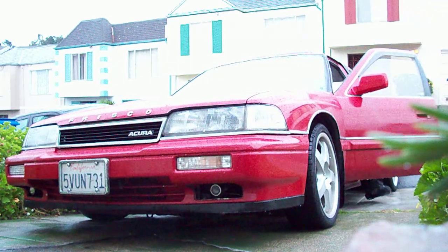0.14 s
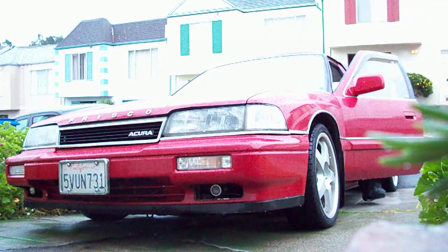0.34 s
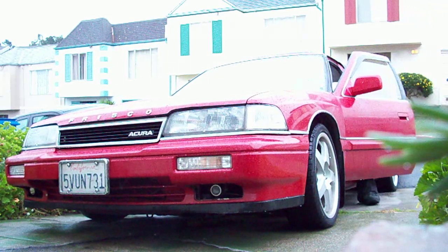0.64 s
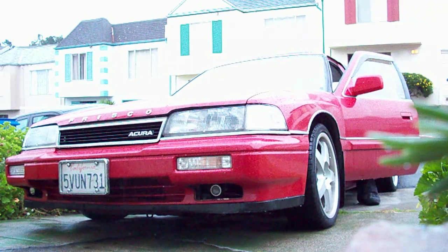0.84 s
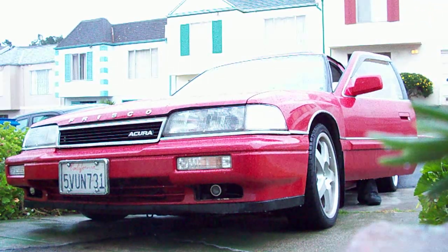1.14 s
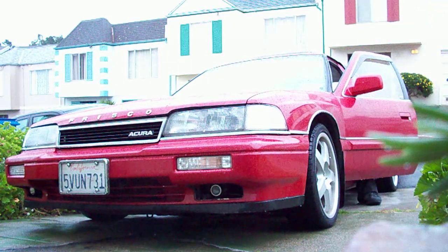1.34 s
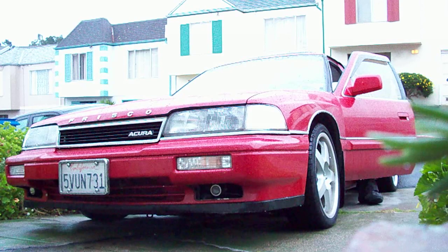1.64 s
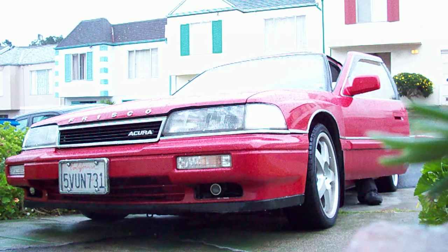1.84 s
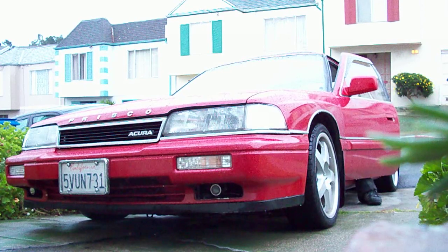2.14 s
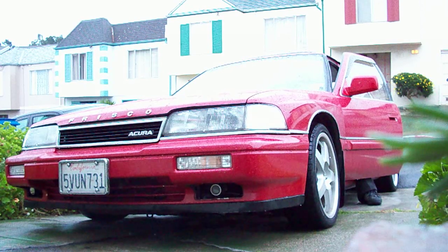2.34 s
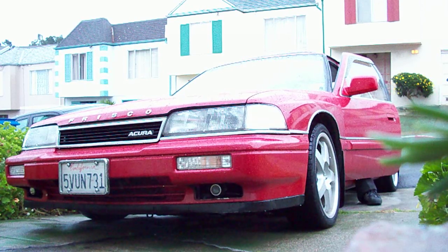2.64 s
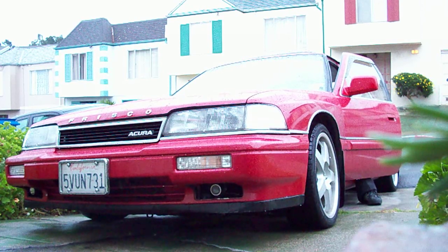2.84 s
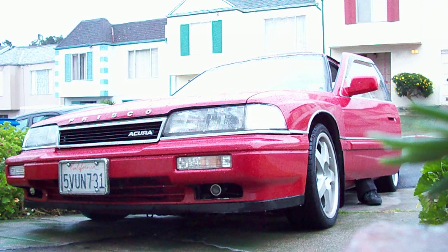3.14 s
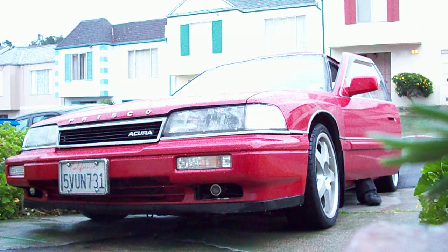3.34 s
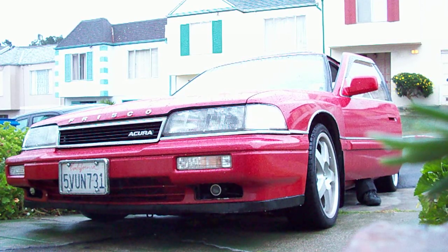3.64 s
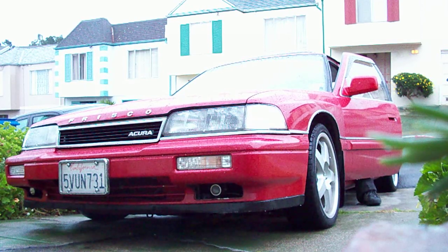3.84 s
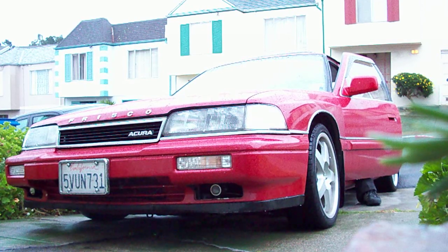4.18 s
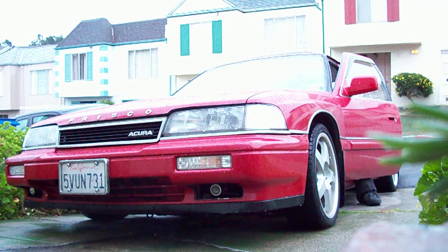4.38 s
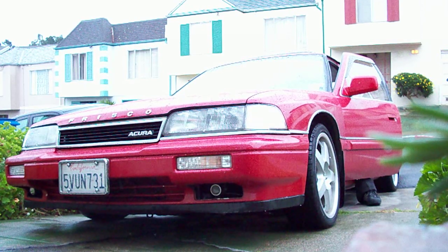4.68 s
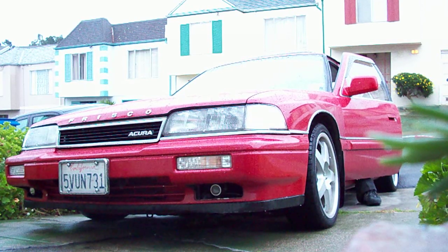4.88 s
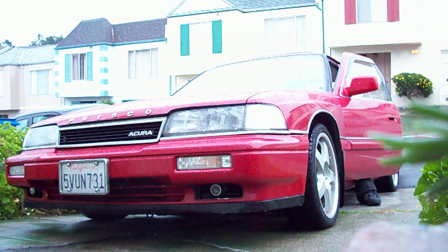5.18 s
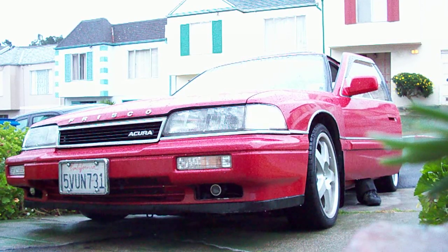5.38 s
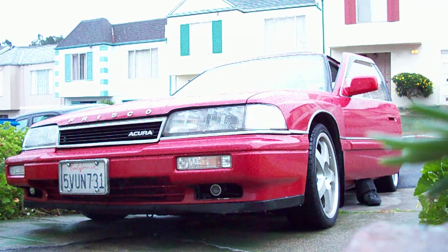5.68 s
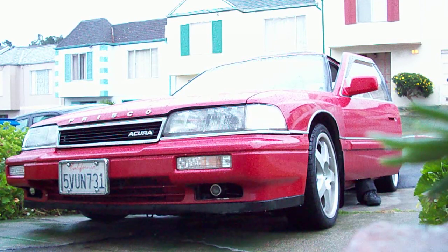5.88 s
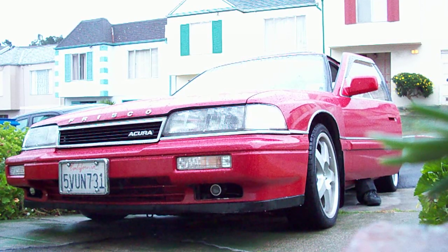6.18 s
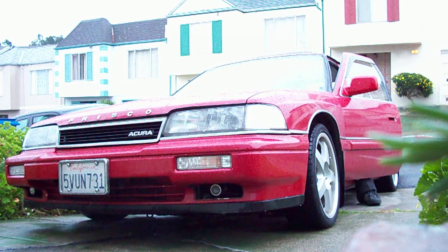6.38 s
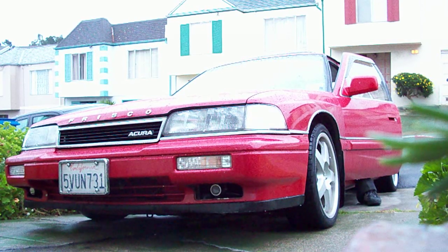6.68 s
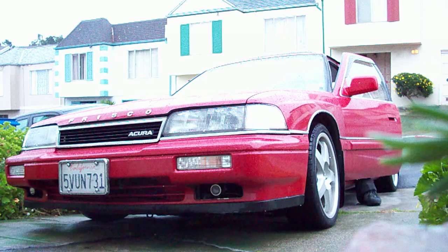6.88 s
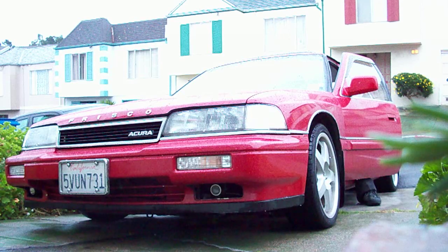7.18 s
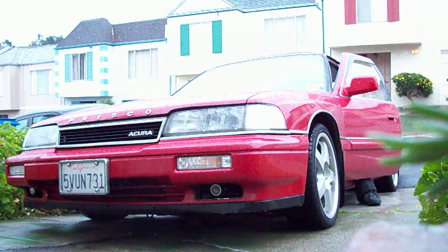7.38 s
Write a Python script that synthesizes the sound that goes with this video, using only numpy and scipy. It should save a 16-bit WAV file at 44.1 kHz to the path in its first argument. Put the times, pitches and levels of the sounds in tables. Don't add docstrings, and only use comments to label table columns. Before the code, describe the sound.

Beside a parked car outdoors, a stuttering hinge creak and small clicks sound over soft, wavering traffic noise and a far engine hum. A short falling bird chirp follows. In the second half come three loud, bright, nasal honks at one steady pitch, each a little shorter than the last, with quick echoes from houses. The recorder's level ducks at every honk, then the street noise swells back.

```python
import sys
import numpy as np
from scipy import signal
from scipy.fft import rfft, irfft
from scipy.io import wavfile
from scipy.ndimage import minimum_filter1d

SR = 44100
rng = np.random.default_rng(int(sys.argv[2]) if len(sys.argv) > 2 else 0)


def waveform_to_disk(signal):
    frames = np.transpose(np.atleast_2d(signal))
    scaled = np.clip(frames, -1, 1) * 32767
    samples = np.round(scaled).astype(np.int16)
    wavfile.write(sys.argv[1], SR, samples)


def elevation(decibels):
    levels = np.asarray(decibels, float)
    return 10 ** (levels / 20)


N = 331632

# time_s, roar_db
CAR_NEARNESS = [(0.0, 3), (.25, 0.5), (.45, 4.5), (.75, 2), (1.1, -0.5), (1.5, 1.8), (1.9, 5), (2.4, 3.5),
                (2.75, 0.5), (3.1, -2), (3.8, -3), (4.9, -4), (5.4, -3), (6.3, -4.5), (6.7, -3), (7.5, 3.3)]
# frequency_hz, density_db (per Hz)
TRAFFIC_SPECTRUM = [(12, -39), (20, -9.5), (43, 2), (75, -3.5), (118, -10.5), (228, -15.5), (308, -20),
                    (387, -28.5), (525, -16.5), (643, -31), (729, -28), (2650, -46), (5260, -50.5),
                    (7500, -55), (8510, -65.5), (11100, -100), (18700, -120)]
# time_s, firing_hz, load_db
ENGINE_RUN = [(0.0, 24.88, 0), (.46, 28.37, -1), (1.0, 31.48, -4), (1.5, 38.83, 2.5), (1.75, 39.52, -6),
              (2.4, 35.97, -5), (2.82, 40.82, -3), (3.55, 43.15, 0.9), (3.85, 47.2, -2), (4.8, 48.6, 0),
              (5.45, 49.6, -1.8), (6.25, 51.4, -2), (6.5, 51.0, -3.5), (6.75, 50.06, 0.8),
              (7.5, 49.87, 0.5)]
# frequency_hz, gain_db
EXHAUST_BOOM = [(25, -49.5), (38, -34.5), (50, -24), (72, -28.5), (88, -26.5), (104, -37.5), (140, -46.5),
                (195, -40)]
# top_s, top_hz, fall_s, level_db
WHISTLES = [
    (1.692, 5320, .034, -43),
    (3.343, 5350, .040, -54),
    (5.308, 5430, .040, -55.5),
]
# start_s, peak_db, pitch_hz, t60_s
DULL_TICKS = [(0.0598, -44, 1480, 0.017), (0.1241, -35, 1510, 0.084), (0.1694, -46, 1790, 0.012),
              (0.384, -35.5, 2880, 0.02), (0.7003, -34.5, 1960, 0.023), (2.607, -43, 1647, 0.028),
              (3.1697, -28.5, 1922, 0.0095), (3.5897, -34.5, 2020, 0.0098), (5.1417, -37.5, 1870, 0.013)]
# start_s, peak_db, pitch_hz, t60_s
BRIGHT_TICKS = [(0.1656, -45, 4890, 0.041), (0.5072, -46, 4800, 0.029), (0.627, -41, 5470, 0.03),
                (0.699, -32, 5050, 0.016), (0.743, -43, 6600, 0.022), (0.9846, -53, 4750, 0.022),
                (3.2746, -42, 6170, 0.059), (3.4176, -43, 4930, 0.027), (5.0456, -44, 5096, 0.024),
                (7.1548, -42, 6820, 0.034)]
# start_s, peak_db, pitch_hz, t60_s
HINGE_CREAKS = [
    (0.055, -33.5, 1280, 0.078),
    (0.1645, -38.5, 1380, 0.069),
    (0.2236, -39, 1420, 0.044),
    (0.2857, -40, 1410, 0.054),
    (0.3356, -36.5, 1320, 0.18),
]
# frequency_hz, t60_s, level_db
FAR_ECHOES = [(500, 0.98, -34.5), (1800, 0.62, -21), (2297.5, 1.3, -31), (2600, 1.2, -43), (3370, 0.9, -27),
              (4540, 0.8, -26), (6050, 0.45, -38), (9000, 0.22, -42.5)]
# delay_s, level_db
HOUSE_RETURNS = [
    (0.116, -8.5),
    (0.228, -20.5),
]
# on_s, off_s, buzz_hz
PRESSES = [
    (4.1428, 4.390, 327.33),
    (5.5005, 5.724, 327.1),
    (6.7872, 6.995, 327.15),
]
UNEVEN_BLOWS_DB = [0.2, 2, 2]
DISC_WHOLE_DB = [-7, -33, -49, -42, -47, -30, 0, -3.5, -26, -32, -31, -33, -35, -40, -43, -26, -39, -31,
                 -28, -27, -38, -31, -42, -40]
DISC_HALF_DB = [-46, -45, -47, -48, -52, -34, -24, -17, -42, -47, -45, -44, -48, -38, -41, -36, -47, -42,
                -26, -43, -32, -37, -45, -50, -54]

RUMBLE_FOLLOWS, HISS_FOLLOWS = 0.5, 0.15
GUST_DB, PATCHY_DB = 1.5, 1.1
THIRD_ORDER_DB, WAVER_DB, PHASE_WANDER_RAD = -8, 2.5, 0.4
CHIRP_RISE_S, CHIRP_BEND_HZ, CHIRP_EDGE_DB = 0.016, 1450, 22
CHIRP_LOUDEST = 0.4
NEAR_DB, NEAR_T60_S = -17, 0.18
DISC_DB, DIAPHRAGM_DB, DIAPHRAGM_START_DB = 7, 0.5, 1.5
CRACK_DB, RELAY_DB, RATTLE_DB = -5, -13, -31.5
STRIKE_LAG_S = 0.0153
SWING_PHASE_RAD, BLOW_PHASE_RAD = 0.65, 3.3
SWING_UP_S, DISC_UP_S = 0.011, 0.0024
DISC_T60_S, RATTLE_T60_S, SETTLE_T60_S, RING_T60_S = 0.038, 0.17, 0.25, 0.316
FREE_HZ, SAG_AFTER_S = 323.0, 0.069
FIRST_BLOWS, FIRST_BLOWS_T60_S = 0.05, 0.012
DUCK_FROM_DB, ATTACK_S, HOLD_S, RELEASE_DB_S = -9, 0.0025, 0.079, 40.5
PREAMP_DB = -64
RECORDER_HZ = 16000
CUT_HZ, CLIP, ROUNDED_HZ = 8030, 0.70, 11500


def in_time(rows):
    s, *columns = np.transpose(rows)
    return [np.interp(np.arange(N) / SR, s, c) for c in columns]


def at_hz(points, hz, axis=1):
    points = np.array(points)
    return np.interp(np.log(hz), np.log(points[:, 0]), points[:, axis])


def drift(rate):
    r = np.exp(-80 * np.pi * rate / SR)
    slow = signal.lfilter([1], [1, -2 * r, r * r], rng.standard_normal(N // 40 + 2002))[2000:]
    return np.interp(np.arange(N) / 40, np.arange(len(slow)), slow / slow.std())


def band(x, low_hz, high_hz):
    return signal.sosfilt(signal.butter(2, [low_hz, high_hz], "band", fs=SR, output="sos"), x)


def swell(t, rise_s, off_s, t60):
    return (1 - np.exp(-np.maximum(t, 0) / rise_s)) * elevation(-60 * np.maximum(t - off_s, 0) / t60)


def traffic():
    near_db, = in_time(CAR_NEARNESS)
    rumble_db = RUMBLE_FOLLOWS * near_db + GUST_DB * drift(4.3)
    hiss_db = HISS_FOLLOWS * near_db
    edges = 20 * 2 ** (np.arange(28) / 3)
    white = rng.standard_normal((2, N))
    out = np.zeros(N)
    for k, (low, high) in enumerate(zip(edges, edges[1:])):
        follow_db = rumble_db if low <= 200 else near_db if low <= 1000 else hiss_db
        level_db = at_hz(TRAFFIC_SPECTRUM, np.sqrt(low * high)) + follow_db + PATCHY_DB * drift(3.4)
        out += elevation(level_db) * band(white[k % 2], low, high)
    out = signal.sosfilt(signal.butter(2, 30.0, "high", fs=SR, output="sos"), out)
    return out / out[:4 * SR].std()


def engine():
    hz, load_db = in_time(ENGINE_RUN)
    turn = 2 * np.pi * np.cumsum(hz) / SR
    out = np.zeros(N)
    for k in range(1, 5):
        level_db = load_db + at_hz(EXHAUST_BOOM, k * hz) + THIRD_ORDER_DB * (k == 3)
        level_db = level_db + WAVER_DB * drift(4.1)
        out += np.sqrt(2) * elevation(level_db) * np.sin(k * turn + PHASE_WANDER_RAD * drift(3.2))
    return out


def bird():
    out, t = np.zeros(N), np.arange(N) / SR
    for top_s, top_hz, fall_s, db in WHISTLES:
        rising = t < top_s
        arc = (t - top_s) / np.where(rising, CHIRP_RISE_S, fall_s)
        arc = np.clip(arc, -3, 3)
        hz = top_hz - CHIRP_BEND_HZ * np.where(rising, 0.2, 1) * np.minimum(np.abs(arc), 1.3) ** 1.5
        from_loudest = (arc - CHIRP_LOUDEST) * np.where(arc < CHIRP_LOUDEST, 0.8, 1.3)
        level_db = db - CHIRP_EDGE_DB * np.abs(from_loudest) ** 3 + 3.2 * drift(60.0)
        out += np.sqrt(2) * elevation(level_db) * np.sin(2 * np.pi * np.cumsum(hz) / SR)
    echo = rng.standard_normal(2000) * elevation(-60 * np.arange(2000) / SR / 0.2)
    return out + elevation(-35) * signal.fftconvolve(out, echo)[:N]


def ticks(rows, width):
    out, t = np.zeros(N), np.arange(3000) / SR
    for (s, db, hz, t60), noise in zip(rows, rng.standard_normal((len(rows), 3000))):
        click = band(noise * swell(t, 0.00089, 0, t60), hz / width, min(hz * width, 9000))
        out[round(s * SR):][:3000] += elevation(db) * click / np.abs(click).max()
    return out


def street(low, high):
    t = np.arange(2 * SR) / SR
    edges = 400 * 2 ** np.arange(0, 4.6, 0.5)
    noise = rng.standard_normal((2 * SR, 2)).T * (t > 0.004)
    far = np.zeros(2 * SR)
    for a, b in zip(edges, edges[1:]):
        far += band(noise[0], a, b) * elevation(-60 * t / at_hz(FAR_ECHOES, np.sqrt(a * b)))
    far = far / np.sqrt(np.sum(far ** 2))
    hz = np.arange(SR + 1) / 2 + 1
    far = irfft(rfft(far) * elevation(at_hz(FAR_ECHOES, hz, axis=2)))
    near = noise[1] * elevation(-60 * t / NEAR_T60_S)
    near = elevation(NEAR_DB) * near / np.sqrt(np.sum(near ** 2))
    return low + high + signal.fftconvolve(high, far + near)[:N]


def ring_out(after_s):
    paths = [(0.011, 0.024)] + HOUSE_RETURNS
    out = 0
    for k, (lag, db) in enumerate(paths):
        out = out + (-1) ** k * elevation(db - 60 * np.maximum(after_s - lag, 0) / RING_T60_S)
    return out


def disc_tone(blows, lines, phases, half_db):
    out = 0
    for (k, db), phase in zip(lines, phases):
        if k == 2:
            continue
        offset = 0 if k in (14, 16) else phase
        out = out + elevation(db + half_db * (k % 2)) * np.cos(k / 2 * (blows - BLOW_PHASE_RAD) + offset)
    return out


def loose_contacts(since, length):
    t, noise = since + STRIKE_LAG_S, rng.standard_normal(SR)
    shape = swell(since, DISC_UP_S, length, RATTLE_T60_S)
    rattle = elevation(RATTLE_DB) * band(noise, 400, 8000) * shape
    rattle += elevation(-36.5) * band(band(noise, 2700, 2800), 2700, 2800) * shape
    rattle += elevation(-23.5) * band(noise, 450, 3700) * swell(since - length, 0.0037, 0, SETTLE_T60_S)
    crack = elevation(CRACK_DB) * band(noise, 240, 6500) * swell(since, 0.000062, 0, 0.0063)
    grazing = np.clip(t / STRIKE_LAG_S, 0, 1) ** 2 * (since < 0)
    scrape = elevation(-16) * band(noise, 1800, 5700) * grazing
    return rattle, crack + scrape


def horn():
    low, high, t = np.zeros(N), np.zeros(N), np.arange(SR) / SR
    lines = [(2 * k + 2, db) for k, db in enumerate(DISC_WHOLE_DB)]
    lines += [(2 * k + 1, db) for k, db in enumerate(DISC_HALF_DB)]
    lines.sort()
    phases = rng.uniform(0, 2 * np.pi, len(lines))
    for (on, off, hz), half_db in zip(PRESSES, UNEVEN_BLOWS_DB):
        at, since, length = round(on * SR), t - STRIKE_LAG_S, off - on - STRIKE_LAG_S
        turn = 2 * np.pi * np.cumsum(np.where(t < off - on + SAG_AFTER_S, hz, FREE_HZ)) / SR
        swing = elevation(DIAPHRAGM_DB + DIAPHRAGM_START_DB) * ring_out(t - (off - on))
        swing = swing * swell(t, SWING_UP_S, 0.8, 0.49) ** 1.41 * np.cos(turn - SWING_PHASE_RAD)
        blows = turn + 0.0089 * drift(25.0)[:SR]
        ring = disc_tone(blows, lines, phases, half_db) * swell(since, DISC_UP_S, length, DISC_T60_S)
        ring = ring * (1 + FIRST_BLOWS * swell(since, 0.00041, 0, FIRST_BLOWS_T60_S))
        rattle, strike = loose_contacts(since, length)
        nudges = sum(swell(t - n / hz, 0.00071, 0, 0.012) for n in (0, 1, 3, 4))
        relay = elevation(RELAY_DB) * nudges * np.sin(7 * turn)
        low[at:at + SR] += swing[:N - at]
        high[at:at + SR] += (elevation(DISC_DB) * (ring + rattle) + strike + relay)[:N - at]
    return low, high


def scene():
    small = ticks(DULL_TICKS, width=1.37) + ticks(BRIGHT_TICKS, width=1.2)
    small += ticks(HINGE_CREAKS, width=1.1) + bird()
    return (street(*horn()) + engine() + elevation(-27) * traffic() + small)[None]


def top_cut(x):
    return signal.sosfilt(signal.butter(12, 15500, fs=SR, output="sos"), x)


def record(dry):
    smooth = np.exp(-1 / (0.00058 * SR))
    power = signal.lfilter([1 - smooth], [1, -smooth], dry[0] ** 2)
    over_db = np.maximum(10 * np.log10(power + 1e-12) - DUCK_FROM_DB, 0)
    hold = 2 * round(HOLD_S * SR / 2) + 1
    held = -minimum_filter1d(-over_db, size=hold, origin=hold // 2)
    slope = RELEASE_DB_S * np.arange(N) / SR
    released = np.maximum.accumulate(held + slope) - slope
    fast = np.exp(-1 / (ATTACK_S * SR))
    duck_db = signal.lfilter([1 - fast], [1, -fast], released)
    hiss = elevation(PREAMP_DB) * band(rng.standard_normal(N), 500, 10000)
    x = dry * elevation(-duck_db) + hiss
    x = signal.sosfilt(signal.ellip(10, 0.5, 60, RECORDER_HZ / 2 + 40, fs=SR, output="sos"), x)
    x = x * (1 + 2 * np.cos(2 * np.pi * RECORDER_HZ * np.arange(N) / SR))
    x = signal.sosfilt(signal.cheby1(10, 0.5, CUT_HZ, fs=SR, output="sos"), x)
    x = signal.sosfilt(signal.ellip(6, 0.3, 40, 8950, fs=SR, output="sos"), x)
    excess = x - np.clip(x, -CLIP, CLIP)
    x = x - signal.filtfilt(*signal.butter(1, ROUNDED_HZ, fs=SR), excess)
    x = x * np.clip((N - np.arange(N)) / (0.004 * SR), 0, 1)
    return top_cut(x)


dry = scene()
out = record(dry)
waveform_to_disk(out)
```